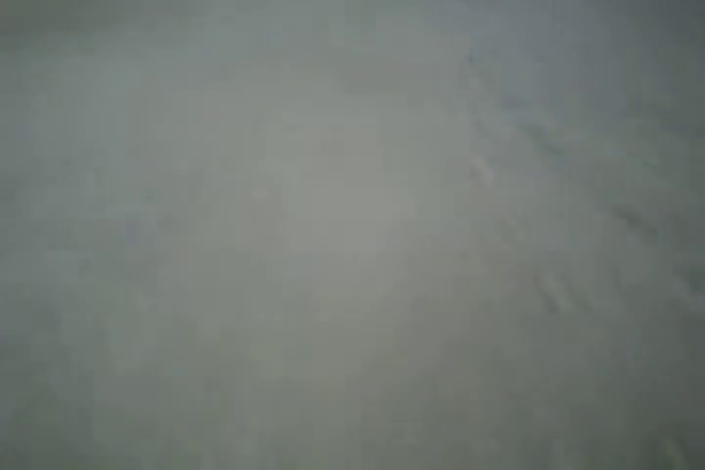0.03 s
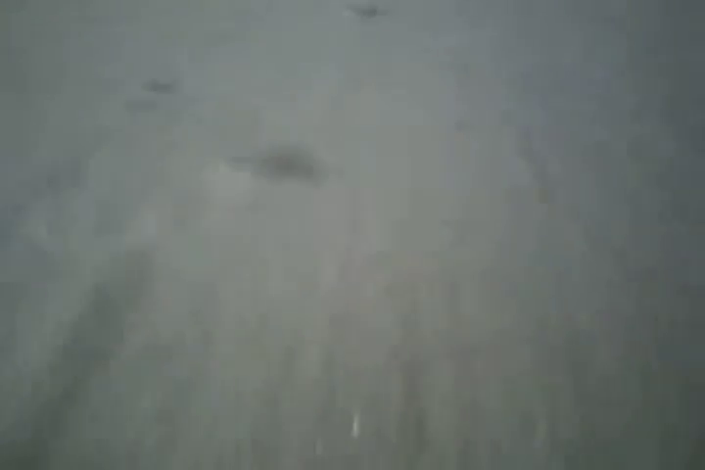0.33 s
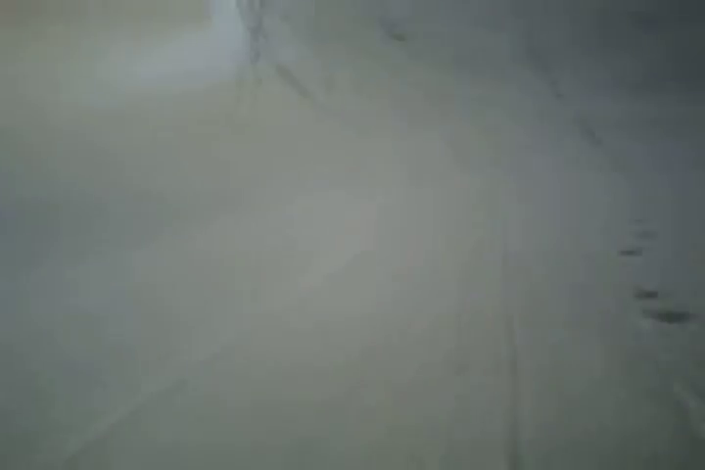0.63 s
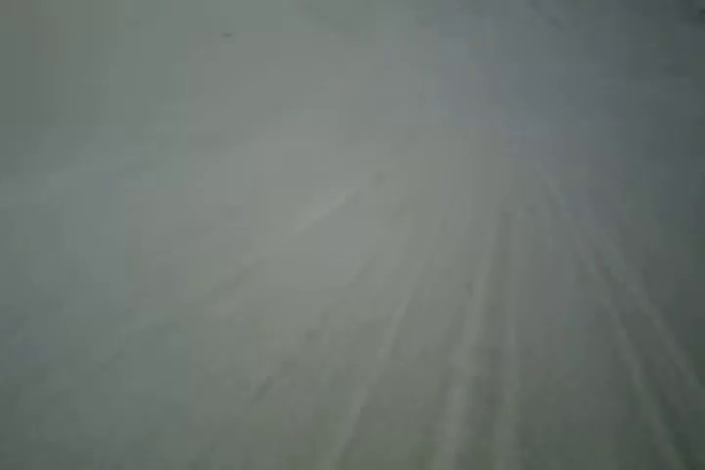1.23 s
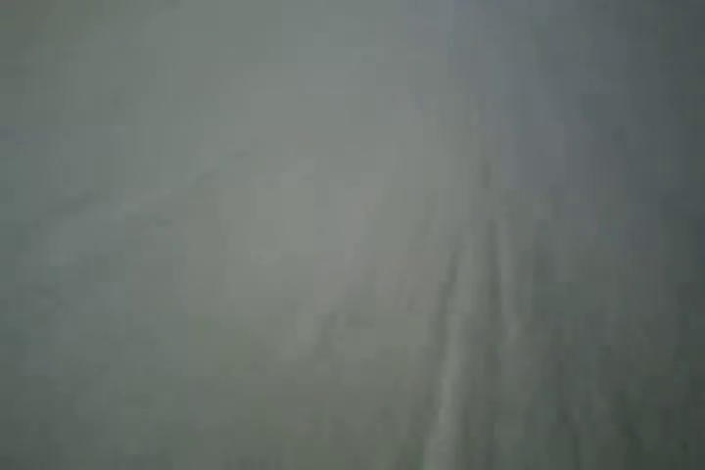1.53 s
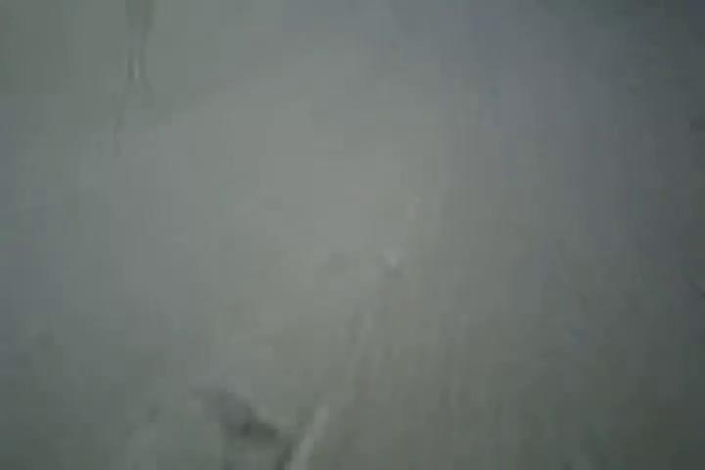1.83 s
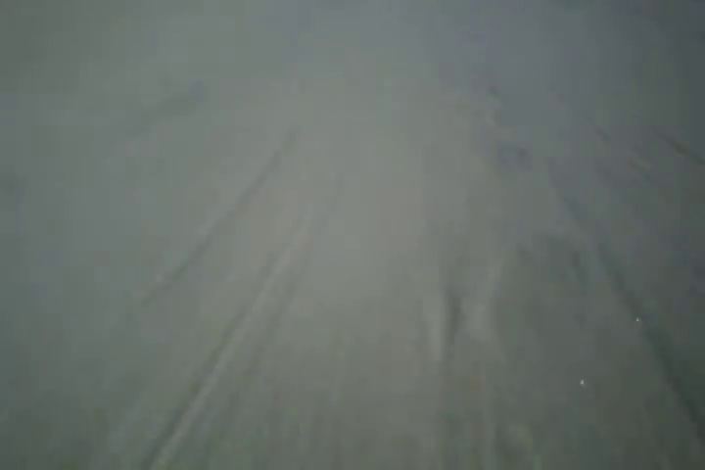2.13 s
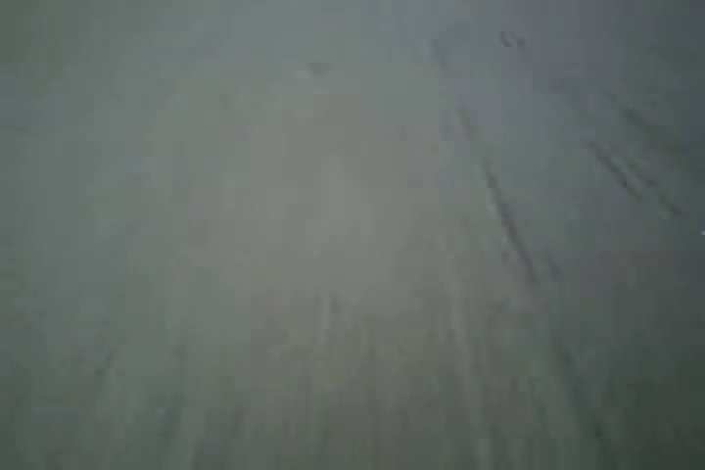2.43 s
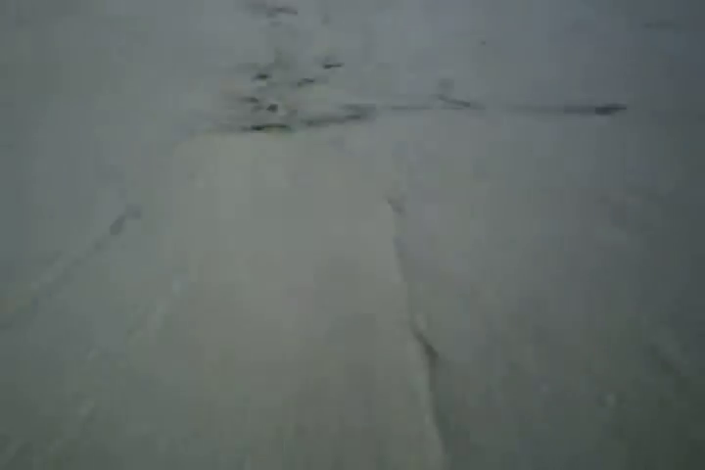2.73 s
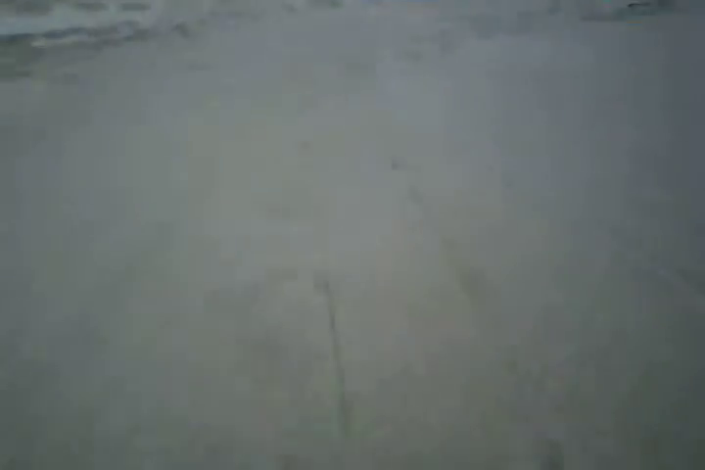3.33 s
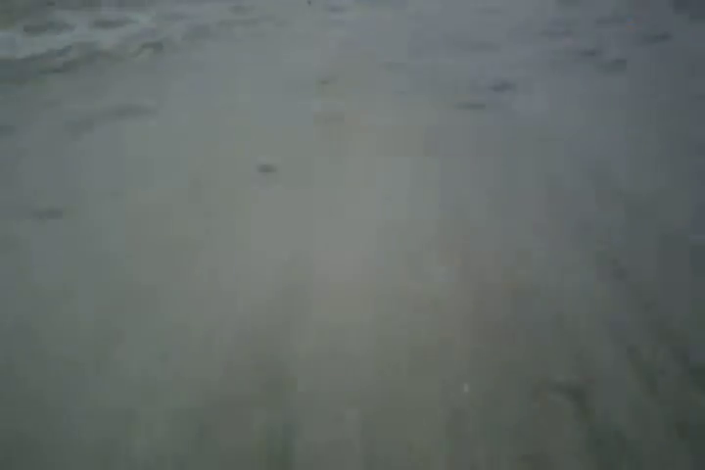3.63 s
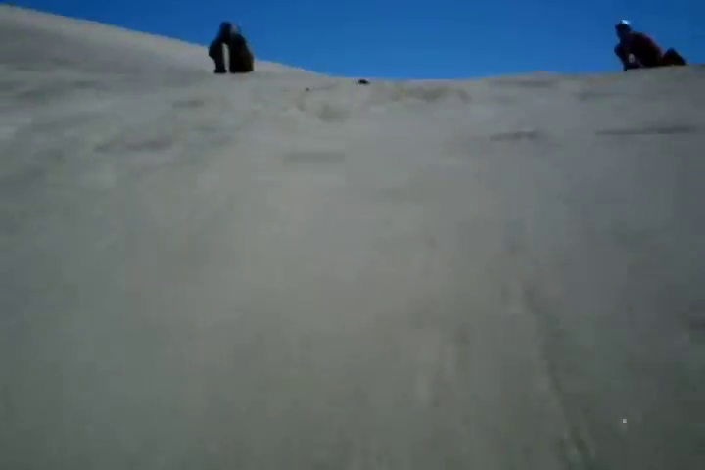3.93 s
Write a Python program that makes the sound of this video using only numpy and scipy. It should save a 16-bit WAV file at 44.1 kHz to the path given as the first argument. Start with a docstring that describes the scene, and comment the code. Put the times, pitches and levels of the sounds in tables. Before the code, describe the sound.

Sand rushes under a sliding board, fading as wind buffets and bumps knock the camera.

```python
"""On a sand dune, a board slides downhill with a camera in a closed plastic housing riding on it.
Wind buffets the housing. Sand rushing under the board sounds through the housing's resonances
and fades as the board slows. Bumps knock the housing in two clusters, ring its modes
and overload the narrow-band recorder."""
import sys
import numpy as np
from scipy import signal
from scipy.fft import rfft, irfft, next_fast_len
from scipy.io import wavfile
from scipy.ndimage import uniform_filter1d

SR = 44100
rng = np.random.default_rng(int(sys.argv[2]) if len(sys.argv) > 2 else 0)


def unload_wav(signal):
    """Save mono or channel-first audio to the path in sys.argv[1] as 16-bit WAV at rate SR, clipped to [-1, 1]."""
    wavfile.write(
        sys.argv[1],
        SR,
        np.round(np.clip(np.atleast_2d(signal).T, -1, 1) * 32767).astype(np.int16),
    )


N = 176400

# wind on the housing: t/s, level/dB
WIND_LEVELS = [(0, -42.5), (.21, -40), (.26, -23.5), (.5, -25), (.57, -43.5), (.9, -34), (1.4, -45.5),
               (1.88, -44.5), (2.04, -32.5), (2.3, -35), (2.83, -38), (3.1, -31.5), (3.3, -31.5),
               (3.66, -27.5), (3.82, -47), (3.93, -34.5), (4.0, -35.5)]
# single gusts: t/s, level/dB
GUSTS = [(2.949, -24), (3.039, -16), (3.238, -21), (3.384, -22), (3.544, -19.5)]
# buffeting spectrum: f/Hz, relative density/dB
WIND_SPECTRUM = [(8, -3.5), (20, 1), (35, -7), (50, -10.5), (70, -6.5), (100, -22.5), (160, -27),
                 (400, -48), (1000, -78.5)]
# housing modes: f/Hz, width/Hz, sliding weight/dB, knock weight/dB
HOUSING_MODES = [(273, 122, -2, -15), (656, 19.6, 7.5, 13), (1011, 264, -3.5, -23), (1137, 130, 0.5, 2.5),
                 (1285, 86, -13, 5.5), (1507, 58.7, -4.5, -3.5), (2143.5, 18.3, -7, 4.5),
                 (2342, 60.7, 1, -5), (2489, 130, -4.5, 3.5), (2998, 380, -9, 5), (3192, 133, -3.5, -9.5),
                 (3561, 103, -3.5, 4.5)]
# sliding: t/s, sand level/dB, rumble level/dB
SLIDE_LEVELS = [(0, -19, -27), (.41, -21.5, -30.5), (.65, -19, -30.5), (1.0, -20, -30), (1.9, -21.5, -31.5),
                (2.12, -24, -35.5), (2.33, -24, -30.5), (2.46, -29, -37.5), (2.75, -28, -34.5),
                (2.97, -32.5, -38), (3.1, -31, -38), (3.35, -32, -37), (3.55, -34.5, -41),
                (3.78, -39.5, -47), (4.0, -36.5, -41.5)]
# broad grain hiss: f/Hz, relative density/dB
HISS_SPECTRUM = [(200, 1.5), (450, -2), (800, 4.5), (1300, -10.5), (1800, -4), (2050, -9), (2700, -6.5),
                 (3800, 8.5), (4500, -4)]
# knocks: t/s, level/dB, brightness corner/Hz, low ring/dB, high ring/dB
KNOCKS = [(.312, -17.5, 2190, -2.5, 2), (.343, -22, 1820, -5, -2), (.4745, -16, 2230, -3, 1),
          (.652, -7, 3650, -7, 2), (.663, -10, 1720, -6.5, 7), (.7065, -5, 1565, 0, 1),
          (.756, -1.5, 8000, -13, -7), (.7615, -10.5, 1600, -18, -18), (0.7862, -13.5, 2800, -12, -0.5),
          (.791, -16, 1580, 7.5, 5), (.815, -11, 850, -1, -2), (3.072, -18, 4000, -12, -8),
          (3.151, -8, 3020, -0.5, 0), (3.1855, -2, 3980, -3.5, -6), (3.1945, -5, 1400, -10.5, -14),
          (3.199, -5.5, 2200, -26, -9.5), (3.209, -11, 8200, -2, 11.5), (3.2868, 0.5, 2280, -2, 4),
          (3.3005, -22.5, 5030, 4, -11), (3.4205, -12.5, 550, -2, -8), (3.4355, -13, 547, 0, -13),
          (3.444, -0.5, 4500, -5, -2), (3.470, -11, 6000, -9, -1.5), (3.6045, -15, 850, -2, 1),
          (3.6408, -5, 3500, -7, -9), (3.9402, -18.5, 5000, -8.5, -3)]
# microphone response: f/Hz, gain/dB
MIC_RESPONSE = [(10, -3.5), (3500, 0), (3720, -9), (3950, -19.5), (4150, -20), (4400, -13), (4600, -21),
                (4850, -70), (5200, -90)]
# recorder band filter: f/Hz, gain/dB
RECORDER_BAND = [(10, 0), (3900, 0), (4350, -4), (4650, -20), (5000, -70)]


def undb(db):
    """Decibels to gain."""
    return 10 ** (np.asarray(db) / 20)


def unit(x):
    """Scale to rms 1."""
    return x / np.sqrt(np.mean(x ** 2))


def curve(table, column):
    """One column of a timed table at every sample."""
    rows = np.array(table)
    return np.interp(np.arange(N) / SR, rows[:, 0], rows[:, column])


def wander(rate_hz):
    """Random steps, smoothed twice; rms 1."""
    hold = int(SR / rate_hz)
    steps = np.repeat(rng.standard_normal(N // hold + 1), hold)
    return unit(uniform_filter1d(uniform_filter1d(steps, hold), hold)[:N])


def colour(x, spectrum):
    """Filter by (f/Hz, gain/dB) points, interpolated over log f."""
    hz, db = np.array(spectrum).T
    size = next_fast_len(len(x) + 8192)
    bins_hz = np.maximum(np.arange(size // 2 + 1) * SR / size, 1)
    gain = undb(np.interp(np.log(bins_hz), np.log(hz), db))
    return irfft(rfft(x, size) * gain, size)[:len(x)]


def resonate(x, hz, width_hz):
    """One resonance, gain 1 at its centre."""
    return signal.lfilter(*signal.iirpeak(hz, hz / width_hz, fs=SR), x)


def wind(gain_db=3, swing_db=4.5, gust_s=.014):
    """Slow pressure swings on the housing, with a few short, strong gusts."""
    t = np.arange(N) / SR
    breeze = undb(curve(WIND_LEVELS, column=1) + swing_db * wander(rate_hz=8.2))
    gusts = sum(undb(db) * np.exp(-((t - peak_s) / gust_s) ** 2) for peak_s, db in GUSTS)
    buffeting = unit(colour(rng.standard_normal(N), WIND_SPECTRUM))
    return buffeting * undb(gain_db) * np.hypot(breeze, gusts)


def grains(spread_db=2):
    """Dense impacts of sand grains of scattered size."""
    return unit(rng.standard_normal(N) * undb(spread_db * rng.exponential(size=N)))


def scraped_mode(hz, width_hz):
    """One housing mode driven by its own grains."""
    pass_width_hz = 1.784 * width_hz  # widened: two passes narrow the peak
    return resonate(resonate(grains(), hz, pass_width_hz), hz, pass_width_hz)


def sand(rush_db=1, hiss_db=-.5, rumble_db=-.5, rumble_top_hz=450, flutter_rms_db=1):
    """Grains scrape the board and excite the housing; the lowest mode is the board's rumble."""
    upper_modes = sum(undb(db) * scraped_mode(hz, width_hz)
                      for hz, width_hz, db, _ in HOUSING_MODES if hz > rumble_top_hz)
    hiss = unit(colour(grains(), HISS_SPECTRUM))
    rush = unit(unit(upper_modes) + undb(hiss_db) * hiss)
    rumble = unit(sum(scraped_mode(hz, width_hz)
                      for hz, width_hz, _, _ in HOUSING_MODES if hz < rumble_top_hz))
    flutter_db = flutter_rms_db * wander(rate_hz=35.39)
    return (rush * undb(rush_db + curve(SLIDE_LEVELS, column=1) + flutter_db)
            + rumble * undb(rumble_db + curve(SLIDE_LEVELS, column=2) + flutter_db))


def knocks():
    """Blows ring the two narrow modes; chatter and rattle of the mount drive the damped ones."""
    chatter_peak_s, rattle_db, rattle_decay_s = .0013, -17, .0055
    ring_width_hz, ring_split_hz, ring_rise_s = 40, 1000, .0018
    t = np.arange(SR // 4) / SR
    blow = signal.unit_impulse(len(t))
    chatter = t / chatter_peak_s * np.exp(1 - t / chatter_peak_s)
    rattle = undb(rattle_db) * np.exp(-t / rattle_decay_s)
    ring_rise = 1 - np.exp(-t / ring_rise_s)
    out = np.zeros(N + len(t))
    for start_s, db, corner_hz, low_ring_db, high_ring_db in KNOCKS:
        shake = rng.standard_normal(len(t)) * np.hypot(chatter, rattle)
        knock = np.zeros(len(t))
        for hz, width_hz, _, mode_db in HOUSING_MODES:
            if width_hz < ring_width_hz:
                ring_db = low_ring_db if hz < ring_split_hz else high_ring_db
                mode = undb(ring_db) * unit(resonate(blow, hz, width_hz) * ring_rise)
            else:
                mode = unit(resonate(shake, hz, width_hz))
            rolloff = 1 / (1 + (hz / corner_hz) ** 2)
            knock += mode * np.sqrt(width_hz) * undb(mode_db) * rolloff
        attack_rms = np.std(knock[:SR // 125])  # first 8 ms
        start = int(start_s * SR)
        out[start:start + len(t)] += knock * undb(db) / attack_rms
    return out[:N]


def scene():
    """Wind, sand and knocks at one microphone."""
    return (sand() + wind() + knocks())[None]


def record(dry):
    """Hard knocks saturate the microphone stage; overshoot of the band filter is clipped again."""
    mic_limit, ceiling, top_hz = .67, .72, 16000
    overloaded = np.clip(colour(dry[0], MIC_RESPONSE), -mic_limit, mic_limit)
    narrowed = np.clip(colour(overloaded, RECORDER_BAND), -ceiling, ceiling)
    lowpass = signal.ellip(8, .2, 70, top_hz, fs=SR, output="sos")
    return signal.sosfilt(lowpass, narrowed)[None]


dry = scene()
out = record(dry)
unload_wav(out)
```